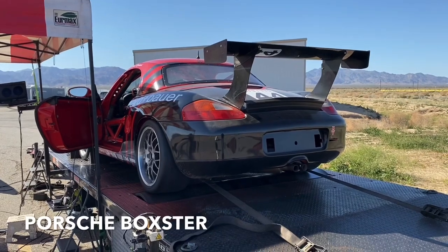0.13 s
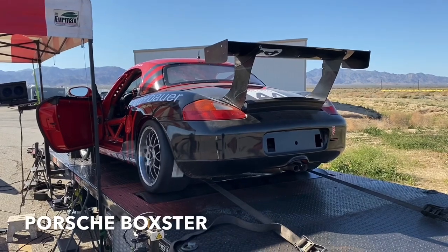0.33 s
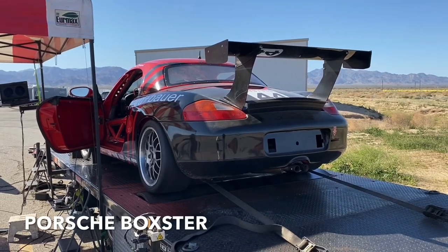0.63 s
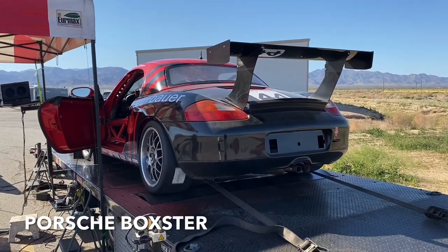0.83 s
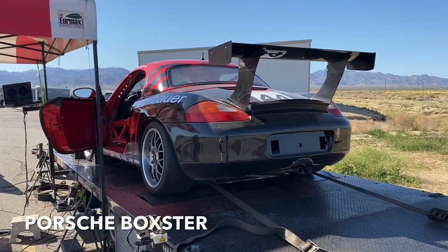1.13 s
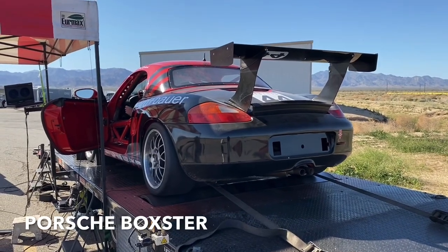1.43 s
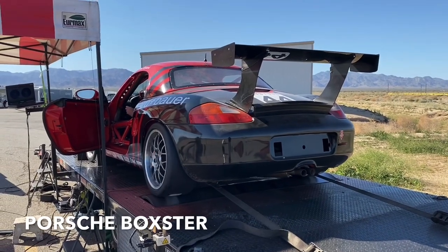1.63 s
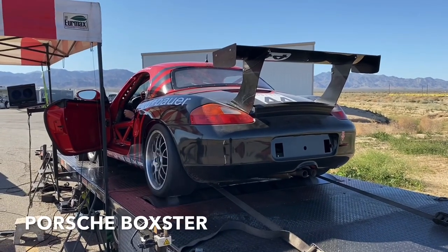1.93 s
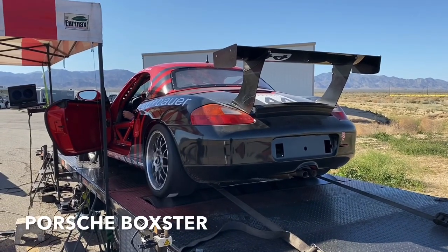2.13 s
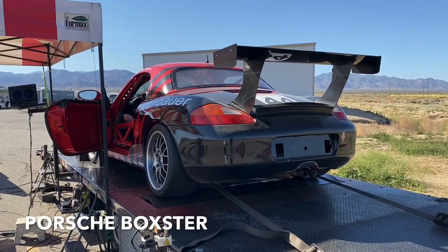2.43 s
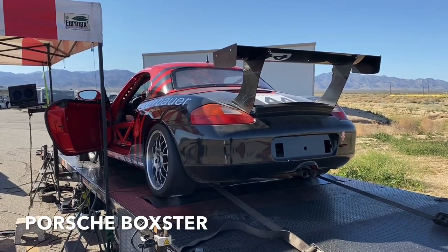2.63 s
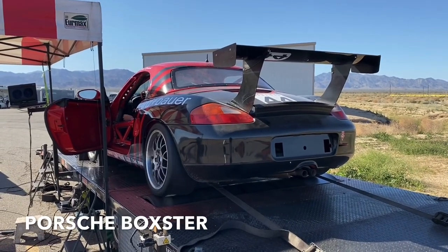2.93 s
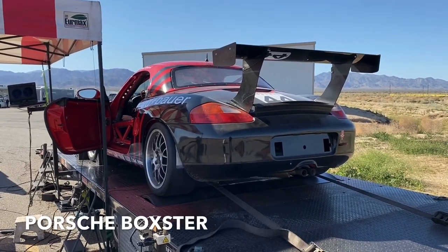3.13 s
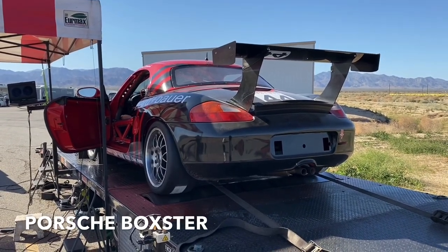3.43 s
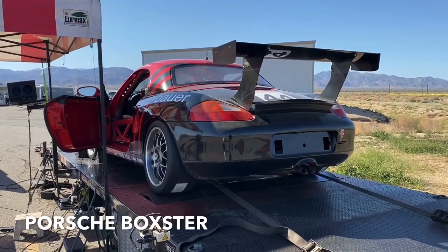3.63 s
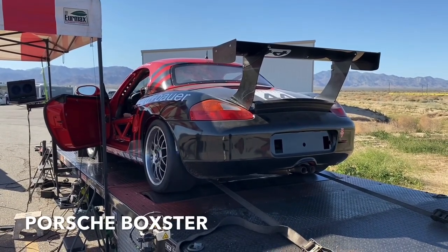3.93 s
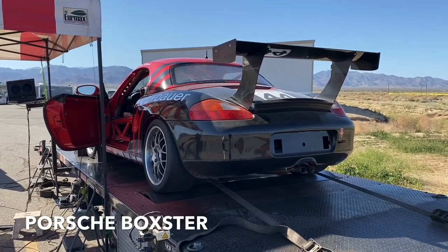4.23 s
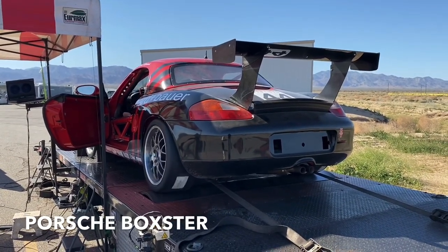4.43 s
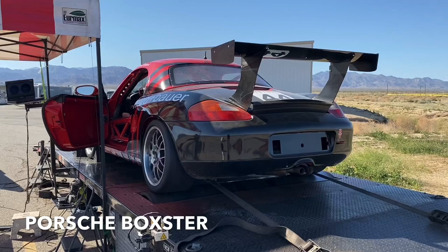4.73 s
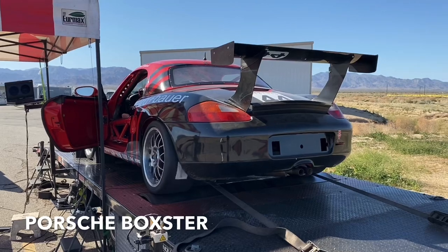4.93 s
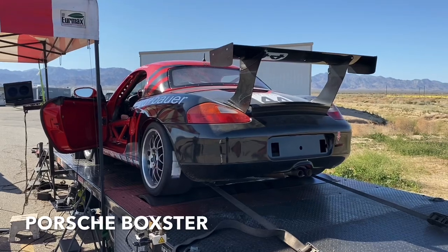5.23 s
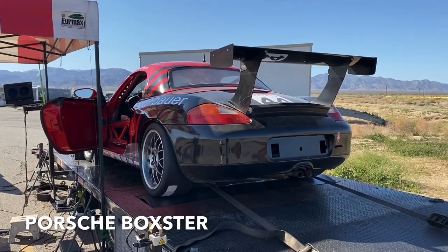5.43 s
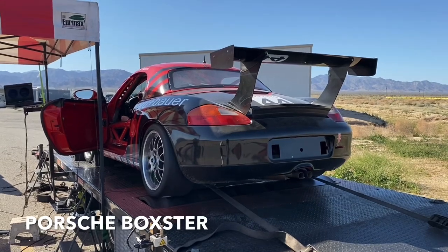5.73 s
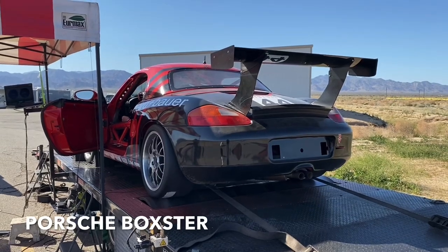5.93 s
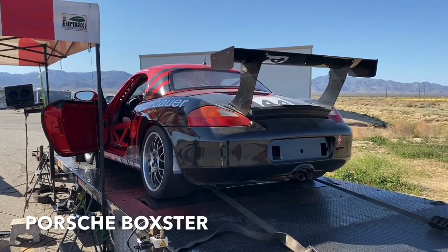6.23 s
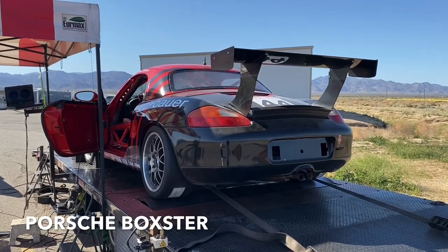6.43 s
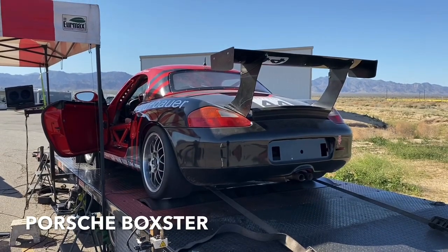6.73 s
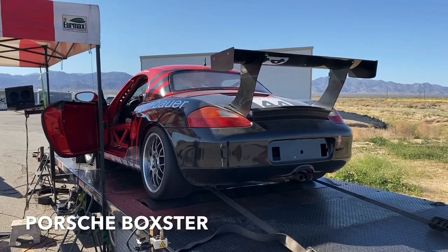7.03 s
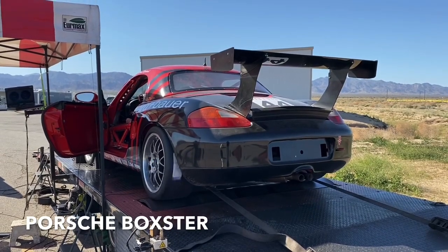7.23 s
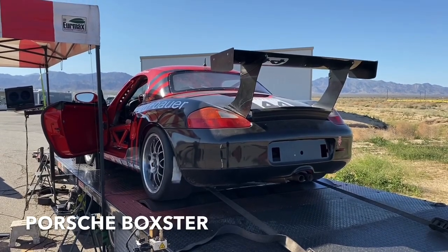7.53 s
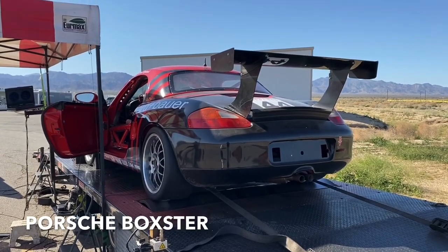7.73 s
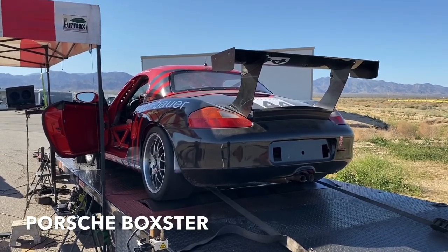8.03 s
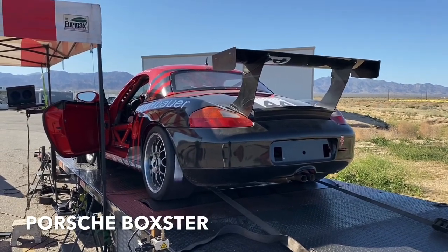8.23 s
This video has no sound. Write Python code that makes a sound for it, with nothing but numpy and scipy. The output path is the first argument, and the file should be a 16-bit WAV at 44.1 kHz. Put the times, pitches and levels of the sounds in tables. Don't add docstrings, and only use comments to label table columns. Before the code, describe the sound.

Heard from behind outdoors, a six-cylinder race car revs up briefly, then coasts with a quiet, smooth hum while tyres whine on steel rollers and valve gear clatters. A short puff of compressed air vents and everything slows in pitch. Then the throttle opens and a long, raspy, droning pull rises to the end, far louder. Stereo microphones a few metres away, dry open air, light wind.

```python
import sys
import numpy as np
from scipy import signal
from scipy.fft import rfft, irfft, next_fast_len
from scipy.io import wavfile
from scipy.ndimage import uniform_filter1d

SR = 44100
rng = np.random.default_rng(int(sys.argv[2]) if len(sys.argv) > 2 else 0)


def persist_wave(psi):
    counts = np.round(np.clip(psi, -1, 1) * 32767).astype(np.int16)
    wavfile.write(sys.argv[1], SR, np.atleast_2d(counts).T)


def boost(x):
    u = np.asarray(x, float) / 20
    return 10 ** u


N = 369116
T = np.arange(N) / SR
THROTTLE_S = 4.165, 4.18
BITE_S = 4.21, 4.285

# [t/s, firing rate f/Hz]
ENGINE = [(0.0, 96.7), (0.09, 105.1), (0.21, 160.5), (0.23, 178.3), (0.3, 168.2), (2.31, 156.7),
          (2.65, 148.5), (3.1, 133.3), (3.68, 117), (4.17, 99.9), (4.21, 95.98), (4.285, 105),
          (4.315, 92.59), (4.37, 98.5), (4.45, 94.8), (4.61, 95.8), (5.45, 113.9), (6.04, 128.8),
          (6.69, 142.9), (7.58, 165), (8.37, 184.8)]
# [t/s, tread pattern rate f/Hz, whine level/dB]
ROLLERS = [(0.0, 86.3, -38), (0.13, 84.5, -42.5), (0.19, 82.6, -40), (0.25, 85, -39), (0.4, 83.96, -39.5),
           (2.27, 77.46, -36), (2.44, 76.27, -38), (2.91, 69.2, -41), (3.36, 63.36, -45), (3.82, 55, -49),
           (4.2, 50, -55)]
# [f/Hz, level/dB]
BODYWORK = [(300, 18), (600, -17), (760, -2.5), (1200, -29), (1450, -5), (1580, 4.5), (1740, 11),
            (1880, -20), (2050, 5), (2400, 3.5), (2570, -5), (2750, 0.5), (3100, -1), (3230, -3),
            (3400, -5), (3600, -1.5), (3900, -3.5), (4100, -14.5), (5500, -12)]
# [firing rate f/Hz, lag/cycles of order 2, order 3, crack, spit]
PIPE_LAG = [(97, .9, .5, 1.13, -.1), (112, .8, .3, .92, -.05), (125, .51, -.2, .72, .2),
            (130, .4, -.4, .59, .3), (138, .4, -.53, .4, .38), (148, .4, -.7, .33, .48),
            (163, .31, -.98, .3, .47), (186, .16, -1.4, .06, .45)]
# [spit level/dB, lag/firings]
CYLINDERS = [(-1, 0), (-3, .02), (0, -.015), (-5, .015), (1, 0), (-2, -.02)]
BANK_ECHOES = [(17, 29, 47), (19, 31, 43)]


def evened(x):
    return x / np.sqrt(np.mean(x ** 2) + 1e-20)


def played(rows):
    s, *columns = np.transpose(rows)
    return [np.interp(T, s, c) for c in columns]


def mapped(rows, hz):
    rate_hz, *columns = np.transpose(rows)
    return [np.interp(hz, rate_hz, c) for c in columns]


def read(points, hz):
    f, value = np.transpose(points)
    return np.interp(np.log(hz + 1), np.log(f + 1), value, left=-70., right=-70.)


def coloured(x, points, size=4096):
    log_gain = np.log(boost(read(points, abs(np.fft.fftfreq(size, 1 / SR)))))
    taps = np.fft.ifft(np.exp(np.conj(signal.hilbert(log_gain)))).real
    return evened(signal.oaconvolve(x, taps[:size // 2])[..., :N])


def drift(rate_hz, count=1):
    steps = int(N / SR * rate_hz) + 2
    knots = rng.standard_normal((count, 2000))[:, :steps]
    return np.array([np.interp(T * rate_hz, np.arange(steps), k) for k in knots]) * np.sqrt(3 / 2)


def since_bite():
    return np.maximum(T - BITE_S[0], 0)


def order_levels():
    # [firing rate f/Hz, level/dB of orders 1, 2, 3, cylinder unevenness level/dB]
    shut_pipe = [(97, -42.5, -40, -47.5, -39), (114.5, -36.5, -40.5, -73, -37), (121, -34.5, -39, -66, -39),
                 (124.5, -35.5, -39, -67, -37), (134, -36.5, -44, -58, -36.5),
                 (151.6, -40, -51.5, -70, -35), (162, -39, -50.5, -69.5, -41), (179, -33, -45, -68, -38)]
    # [firing rate f/Hz, level/dB of orders 1, 2, 3, cylinder unevenness level/dB]
    open_pipe = [(95.84, -24, -21, -19.5, -17), (106.7, -21.5, -22, -28, -11.5),
                 (114.2, -16, -20, -23, -16.5), (122, -14.5, -17, -25, -14),
                 (134.1, -15.5, -14, -27.5, -15.5), (145.4, -16, -13, -21.5, -12.5),
                 (151, -13, -11, -23, -13.5), (155.2, -15, -14, -27, -12.5),
                 (166.65, -13.5, -18, -34, -11.5), (174, -12.5, -17.5, -39, -11.5),
                 (182, -11.5, -19.5, -28.5, -10.5)]
    fill_db, fill_s = -9.5, 0.21
    shunt_db, shunt_hz, shunt_s = 5., 14., .07
    wake_db, wake_s = -18, 0.094
    clutch_s, clutch_db, clutch_width_s = 0.177, -3, 0.009

    hz = played(ENGINE)[0]
    since = np.maximum(T - BITE_S[1], 0)
    rock = shunt_db * np.exp(-since / shunt_s) * np.cos(2 * np.pi * shunt_hz * since)
    wide = np.array(mapped(open_pipe, hz)) + rock * np.array([[1], [-.3], [.9], [0]])
    wide = wide + fill_db * np.exp(-since / fill_s) * np.array([[.6], [1], [1.6], [.5]])
    shut = np.array(mapped(shut_pipe, hz))
    shut = shut + wake_db * np.exp(-T / wake_s) * np.array([[1], [.4], [.4], [.4]])
    shut = shut + clutch_db * np.exp(-((T - clutch_s) / clutch_width_s) ** 2)
    bite = np.interp(T, BITE_S, [0, 1]) ** np.array([[.75], [.45], [.3], [.75]])
    return hz, shut + bite * (wide - shut)


def exhaust_tone(firm_db=.2):
    # [multiple of firing rate, level/dB]
    coast_orders = [(0.167, -47), (0.333, -23), (0.5, -3), (0.667, -12), (0.833, -18.5), (1.0, 0),
                    (1.17, -29), (1.33, -9), (1.5, -13), (1.67, -47), (1.83, -33), (2.0, -14), (2.17, -57),
                    (2.33, -21), (2.5, -17.5), (2.67, -55), (2.83, -63.5), (3.0, -29), (3.17, -61.5),
                    (3.33, -16), (3.5, -41.5), (3.67, -40), (3.83, -38)]
    # [multiple of firing rate, level/dB]
    load_orders = [(0.167, -54), (0.333, -42.5), (0.5, -29), (0.667, -44), (0.833, -42), (1.0, 0),
                   (1.17, -33), (1.33, -19.5), (1.5, -14), (1.67, -23.5), (1.83, -24), (2.0, -1),
                   (2.17, -60), (2.33, -13.5), (2.5, -20.5), (2.67, -19.5), (2.83, -53), (3.0, -13),
                   (3.17, -54), (3.33, -23), (3.5, -21.5), (3.67, -67), (3.83, -74)]
    # [f/Hz, level/dB]
    muffler = [(20, -15), (50, -39), (80, -11.5), (110, 4.5), (150, -4.5), (200, -7), (260, -2), (340, -5),
               (450, -13), (750, 1)]

    hz, (first_db, second_db, third_db, uneven_db) = order_levels()
    turns = np.cumsum(hz) / SR
    lags = [0] + mapped(PIPE_LAG, hz)[:2]
    out = np.zeros(N)
    orders = zip([first_db, second_db, third_db], lags, drift(25., count=3))
    for k, (db, lag, s) in enumerate(orders, 1):
        out += boost(db + firm_db * s) * np.cos(2 * np.pi * (k * turns - lag))

    load = np.interp(T, THROTTLE_S, [0, 1])
    shake = drift(6., count=len(load_orders)) * (1 + .6 * load)
    for k, ((_, shut_db), (_, open_db)) in enumerate(zip(coast_orders, load_orders), 1):
        if k % 6 == 0:
            continue
        db = uneven_db + shut_db + load * (open_db - shut_db) + read(muffler, k / 6 * hz) + shake[k - 1]
        slow_db = {9: -17, 14: -11, 15: 3, 16: -11}.get(k, -7 * (k < 18))
        db = db + load * np.interp(hz, [97, 115 if k == 9 else 135], [slow_db, 0])
        out += boost(db) * np.cos(2 * np.pi * (k / 6 * (turns - 2.1) + .65))

    for k, s in enumerate(drift(4., count=12), 24):
        db = uneven_db - 28.0 + 6. * np.minimum(s, .5) + read(BODYWORK, k / 6 * hz)
        out += (1 - load) * boost(db) * np.cos(2 * np.pi * (k / 6 * turns + rng.random()))
    return np.sqrt(2) * out


def tyre_whine(wobble_db=.8):
    # [multiple of the tread rate, level/dB]
    whines = [(9, -0.5), (10, 0), (18, -5), (19, -7.5), (27, -9.5), (28, -3.5), (32, -18), (33, -16),
              (34, -4), (36, -3.5), (37, 1.5), (38, -22), (41, -12), (43, -0.5), (45, -1), (46, 0),
              (47, -9), (50, -14), (52, 0.5), (54, -5), (55, -5), (56, -6), (58, -10)]
    hz, whine_db = played(ROLLERS)
    turns = np.cumsum(hz) / SR
    out = np.zeros(N)
    for (k, db), s in zip(whines, drift(14., count=len(whines))):
        level = boost(db + wobble_db * s + read(BODYWORK, round(k) * hz))
        out += level * np.cos(2 * np.pi * (round(k) * turns + rng.random()))
    return out * boost(whine_db - 12.0) * np.interp(T, [4.2, 4.5], [1, 0])


def gear_whistles():
    # [multiple of the tread rate, width f/Hz, level/dB]
    whistles = [(84.5, 160, -69.5), (125, 150, -75)]
    hz = played(ROLLERS)[0]
    turns = np.cumsum(hz) / SR
    out = np.zeros(N)
    for k, width_hz, db in whistles:
        fuzz = signal.lfilter([1], [1, -np.exp(-np.pi * width_hz / SR)], rng.standard_normal((2, N)))
        phase = 2 * np.pi * k * turns
        whistle = evened(fuzz[0] * np.cos(phase) + fuzz[1] * np.sin(phase))
        out += boost(db + np.interp(k * hz, [4400, 4900, 6500], [4., 2., 0])) * whistle
    return out * np.interp(T, [4.2, 4.5], [1, 0])


def valve_ticks(depth, width):
    turns = np.cumsum(played(ENGINE)[0]) / SR / 2
    strong = np.array([1, .6, .55])[turns.astype(int) % 3]
    return 1 + depth * strong * np.exp(-((turns % 1 - .6) / width) ** 2)


def rolling_noise():
    # [f/Hz, level/dB]
    rolling = [(40, -34), (70, -13), (160, 15), (280, 6), (440, 2.5), (760, 5), (994, 2), (1210, 6),
               (1810, 0.5), (2210, 4.5), (2540, -2.5), (2910, 4.5), (3630, -1), (5400, -16), (7500, -24)]
    whine_db = played(ROLLERS)[1]
    start_db = -2.5 * np.exp(-T / 1.05)
    noise_db = -42.5 + 0.27 * (whine_db + 36.5) + start_db
    return boost(noise_db) * coloured(valve_ticks(0.89, 0.15) * rng.standard_normal(N), rolling)


def air_hiss():
    # [f/Hz, level/dB]
    air = [(4000, -15), (5500, -19), (7500, 7), (10000, 2.5), (13000, 1), (16000, -3)]
    return boost(-61.5) * coloured(valve_ticks(0.42, 0.11) * rng.standard_normal(N), air)


def fan():
    level = boost(-58.5 + 3.3 * drift(3.55)[0])
    hz = 55. + 0.95 * drift(2.02)[0]
    return level * np.sqrt(2) * np.cos(2 * np.pi * np.cumsum(hz) / SR)


def wind(apart=.36):
    # [f/Hz, level/dB]
    gust = [(25, -36), (42, -22), (55, -1.5), (75, -11), (120, -5.5), (200, -7)]
    # [t/s, level/dB, decay either side in dB per s]
    gusts = [(0, -61, 133), (.28, -67, 162), (.85, -70, 26), (1.4, -69, 24), (1.89, -70, 25),
             (2.26, -69, 50), (3.66, -67, 57), (4.3, -56, 20), (5.36, -30, 130), (5.74, -43, 126),
             (5.9, -42, 139), (6.53, -49, 100), (6.64, -43, 130), (6.95, -37, 34), (8.09, -42, 26),
             (8.37, -51, 120)]
    both, left, right = (coloured(v, gust, size=8192) for v in rng.standard_normal((3, N)))
    breeze = boost(-70.5 + 23.5 * np.interp(T, BITE_S, [0, 1]))
    level = breeze + sum(boost(db - fall * abs(T - s)) for s, db, fall in gusts)
    return level * np.array([both + apart * left, both + apart * right])


def brake_puff():
    # [f/Hz, level/dB]
    valve = [(1500, -30), (3000, -13), (5000, -8), (7500, -7), (10000, -2), (13000, -6.5), (16000, -8)]
    start_s, rise_s, hold_s, fade_s = 2.118, 0.0085, 0.073, 0.39
    age = T - start_s
    fade = np.maximum(age - hold_s, 0) / fade_s
    puff = np.clip(age / rise_s, 0, 1) ** 2 * boost(np.maximum(-36. - 39 * fade ** 2, -200))
    return puff * coloured(rng.standard_normal(N), valve)


def panels():
    # [middle t/s, length t/s, multiple of firing rate, level/dB]
    panel_rings = [(2.497, 0.32, 5, -53), (2.65, .3, 5.25, -57), (3.152, .25, 5.67, -58),
                   (3.2, 0.28, 4, -60), (3.25, 0.4, 8, -57), (3.6, 0.66, 5, -60), (3.799, .5, 4.33, -61),
                   (3.852, 0.43, 6.05, -58), (3.87, .25, 7.9, -56)]
    turns = np.cumsum(played(ENGINE)[0]) / SR
    out = np.zeros(N)
    for s, length, k, db in panel_rings:
        swell = np.cos(np.pi * np.clip((T - s) / length, -.5, .5))
        out += boost(db) * np.sqrt(2) * swell * np.cos(2 * np.pi * k * turns)
    return out


def gas_levels():
    # [t/s, level/dB]
    effort = [(4.2, -67), (4.25, -47), (4.3, -40), (4.45, -35), (4.75, -28.5), (5.17, -26.5), (5.6, -23),
              (6.24, -23), (6.65, -17), (7.03, -16.5), (7.29, -19.5), (7.7, -18.5), (8.37, -18.5)]
    effort_db = played(effort)[0]
    over_db = effort_db + 25.
    hiss_db = -48. + over_db * np.where(over_db > 0, 1.52, 0.71)
    drone_db = np.maximum(-27 + 0.19 * over_db, np.minimum(-37, effort_db + 11.))
    drone_db = drone_db - 8 * np.exp(-since_bite() / 0.18)
    drone_db = drone_db + np.interp(T, (4.2, 4.23), [-30, 0])
    return effort_db, hiss_db, drone_db


def bank_cracks(hz, turns, chance):
    # [firing rate f/Hz, crack level/dB of cylinders 1-6]
    headers = [(120.1, 2.5, -2.5, 1.5, 2.0, -1.5, -1.0), (128.63, 0, 4, -1, 1.5, 0, -3),
               (137.4, -5.5, 1.5, 3.5, -6, 1, 0.5), (146.4, 0, -1, 0, -3, 0.5, 7),
               (147.9, 6, -2.0, 1.5, 0.5, -4, 4), (154.6, 2, -1, 0, 0.5, -6, -2.5),
               (159.1, 3, 4.5, 2, 1.5, 0.5, -0.5), (168, 4.5, -2.5, -0.5, 2.5, -1, -2),
               (177, 6.5, -0.5, 0.5, -1, 0.5, 1.5), (181, 3, 0.5, 5.5, -5, -4, -2.5),
               (186.1, -3, 3, 3.5, 0, -2, -2)]
    firing = np.arange(len(chance))
    lag = np.array(CYLINDERS)[firing % 6, 1]
    place = np.interp(firing + lag + .006 * chance[:, 0], turns, np.arange(N - 0.))
    place = np.maximum(place - .8 * sum(BANK_ECHOES[0]), 0)
    whole = np.minimum(place.astype(int), N - 2)
    own_db = np.array(mapped(headers, hz[whole]))[firing % 6, firing]
    size = boost(1.1 * own_db + .5 * np.clip(chance[:, 1], -2, 1.5))
    banks = np.zeros((2, N))
    banks[firing % 2, whole] = size * (1 - place + whole)
    banks[firing % 2, whole + 1] = size * (place - whole)
    return banks, size


def smeared(x, delays, echo=.2):
    for d in delays:
        loop = np.r_[1, np.zeros(d - 1), echo]
        x = signal.lfilter(loop[::-1], loop, x)
    return x


def pipe_rasp(hz, banks, rush):
    # [f/Hz, level/dB]
    pipe = [(560, -88), (950, -9), (1090, -4.5), (1200, 3.5), (1610, 2), (1850, -2.5), (2360, -4.5),
            (2660, -10.5), (3300, -15), (3750, -14.5), (4200, -20), (4690, -24.5), (5010, -24.5),
            (5400, -30.5), (7000, -32.5), (9100, -94), (15400, -120)]
    # [t/s, share 0-1]
    roughness = [(4.2, .78), (6.1, .64), (6.5, .33), (7.1, .33), (7.3, .42), (7.6, .24), (8.37, .22)]
    hot_s = 7.6, 8.5
    steady, steady_hz = .5, 2300
    treble_lag, tail_lag = 40, 58

    cracks = sum(smeared(b, d) for b, d in zip(banks, BANK_ECHOES))
    cracks = cracks + np.interp(T, hot_s, (.12, .35)) * np.roll(cracks, tail_lag)
    rough = played(roughness)[0]
    drive = np.sqrt(1 - rough) * evened(-cracks * np.sqrt(hz[-1] / hz)) + np.sqrt(rough) * evened(rush)
    treble = np.sqrt(1 - steady) * drive + np.sqrt(steady) * rng.standard_normal(N)
    top = signal.butter(4, steady_hz, "high", fs=SR, output="sos")
    drive = drive + signal.sosfiltfilt(top, np.roll(treble, treble_lag) - drive)
    heat = np.interp(T, hot_s, [0, 1])
    hot_pipe = [(f * 1.012 if f < 1700 else f, db) for f, db in pipe]
    return evened((1 - heat) * coloured(drive, pipe) + heat * coloured(drive, hot_pipe))


def chamber_lines(hz):
    # [firing rate f/Hz, level/dB of orders 4, 5, 6, 7]
    chambers = [(97.7, -38.5, -53, -39.5, -46), (98.5, -37, -43, -43, -36), (105, -38, -35, -37, -33.5),
                (108.9, -46, -36, -47, -45.0), (114.6, -36, -37.5, -32.5, -45),
                (121.7, -41, -38.5, -38, -42), (128.7, -45, -40, -32, -39), (134.2, -33, -43, -40, -57),
                (139, -49, -25.5, -32.5, -47), (145.7, -49, -26, -42, -35), (152.6, -30.5, -31, -49, -29.5),
                (161.4, -40, -38, -48, -30.5), (165, -49, -32.5, -59, -32), (172, -32.5, -31, -32, -60),
                (177.7, -34, -23, -35, -52), (185, -26.5, -35, -34, -54)]
    turns = np.cumsum(hz) / SR
    lines = sum(boost(db + s) * np.cos(2 * np.pi * k * turns)
                for k, (db, s) in enumerate(zip(mapped(chambers, hz), drift(12., count=4)), 4))
    return np.sqrt(2) * lines * boost(-22 * np.exp(-since_bite() / .07))


def silencer_drone(banks, size, last, rush):
    # [f/Hz, level/dB]
    boom = [(330, -11), (400, 1.5), (500, -3), (600, -0.5), (720, 2), (860, 3), (950, -10.5), (1050, -19)]
    uneven = banks.sum(0) * (1 - uniform_filter1d(size, size=6) / size)[last]
    return boost(-2.5) * coloured(0.45 * evened(uneven) + .5 * evened(rush), boom)


def spit_jet(turns, chance, noise):
    # [f/Hz, level/dB]
    jet = [(5000, -23), (7000, -21), (8200, -6), (10300, -6.5), (12000, -10.5), (14000, -10), (16000, -16)]
    own_spit_db = np.array(CYLINDERS)[np.arange(len(chance)) % 6, 0]
    burst = boost(own_spit_db + 4.2 * np.clip(chance[:, 2], -2, 1))
    last = np.clip(turns, 0, None).astype(int)
    return coloured(noise * (0.2 + burst[last] * np.exp(-(turns % 1) / 0.1)), jet)


def tailpipe():
    hz = played(ENGINE)[0]
    crank = np.cumsum(hz) / SR
    _, _, crack_lag, spit_lag = mapped(PIPE_LAG, hz)
    turns = crank - crack_lag
    rasp_db, hiss_db, boom_db = gas_levels()
    chance = rng.standard_normal((1500, 3))[:int(turns[-1]) + 2]
    banks, size = bank_cracks(hz, turns, chance)
    gas = rng.standard_normal((2, N))
    last = np.clip(turns, 0, None).astype(int)
    rush = gas[0] * (.4 + size[last] * np.exp(-(turns % 1) / .3))
    out = boost(rasp_db) * pipe_rasp(hz, banks, rush)
    out = out + chamber_lines(hz)
    out = out + boost(boom_db) * silencer_drone(banks, size, last, rush)
    out = out + boost(hiss_db + 5.0) * spit_jet(crank - spit_lag, chance, gas[1])
    return np.interp(T, THROTTLE_S, [0, 1]) * out


def intake():
    whoop_s, whoop_hz = (4.22, 4.3, 4.4), (480, 535, 585)
    swell = np.interp(T, whoop_s, [0, 1, 0])
    turns = np.cumsum(np.interp(T, whoop_s, whoop_hz)) / SR
    return boost(-44) * np.sqrt(2 * swell) * np.cos(2 * np.pi * turns)


def ports(x, t60=.15):
    # [f/Hz, lead/radians]
    port_lead = [(0, 0), (1810, -.7), (2700, -.2), (3700, -.4), (6400, .3), (7700, -1.9), (8300, -2.9),
                 (8700, -3.5), (9400, -5.6), (10900, -6.6), (11600, -9.2), (12600, -9.7), (13300, -12.4),
                 (14700, -12.7), (15500, -5 * np.pi), (22050, -16)]
    # [f/Hz, level/dB]
    port_db = [(60, -.5), (200, -.8), (310, -2), (700, 1), (1290, -.5), (2380, 3.2), (4400, 1), (8120, -.4),
               (15000, 0)]
    # [f/Hz, level/dB]
    scatter = [(60, -28), (300, -15), (700, -16), (2000, -10), (4500, -1), (6500, -3), (8000, -6),
               (16000, -6)]
    size = next_fast_len(N + SR)
    hz = np.fft.rfftfreq(size, 1 / SR)
    balance = boost(np.interp(hz, *np.transpose(port_db)) / 2)
    half = balance * np.exp(.5j * np.interp(hz, *np.transpose(port_lead)))
    age = np.arange(SR // 5) / SR
    tails = rng.standard_normal((2, SR // 5)) * boost(-60 * age / t60)
    tails = tails - .4 * tails.mean(0)
    tails = rfft(tails / np.linalg.norm(tails[0]), size) * boost(read(scatter, hz))
    return irfft(rfft(x, size) * (np.array([half, 1 / half]) + tails), size)[:, :N]


def scene():
    car = exhaust_tone() + tailpipe()
    bench = tyre_whine() + gear_whistles() + rolling_noise()
    extras = panels() + brake_puff() + air_hiss() + fan() + intake()
    return ports(car + bench + extras) + wind()


def band_limit(x):
    return signal.sosfilt(signal.butter(12, 16040, fs=SR, output="sos"), x)


def record(dry):
    dry = dry * boost(np.interp(T, (6.66, 6.672), [0, -3.5]))
    mix = 1.15 * np.tanh(dry / 1.15)
    return band_limit(mix)


dry = scene()
out = record(dry)
persist_wave(out)
```